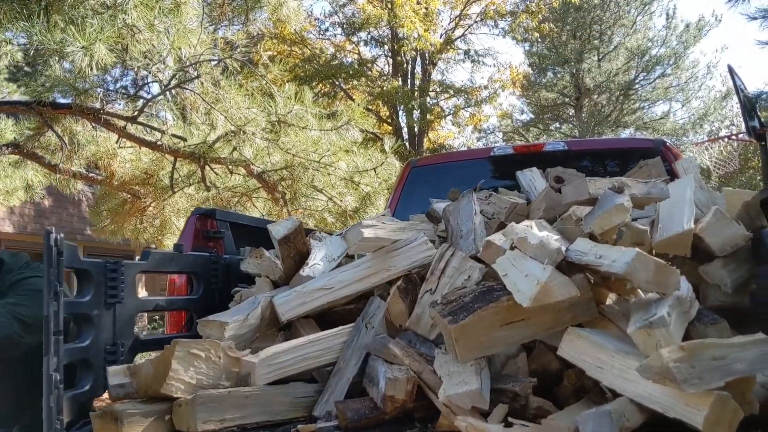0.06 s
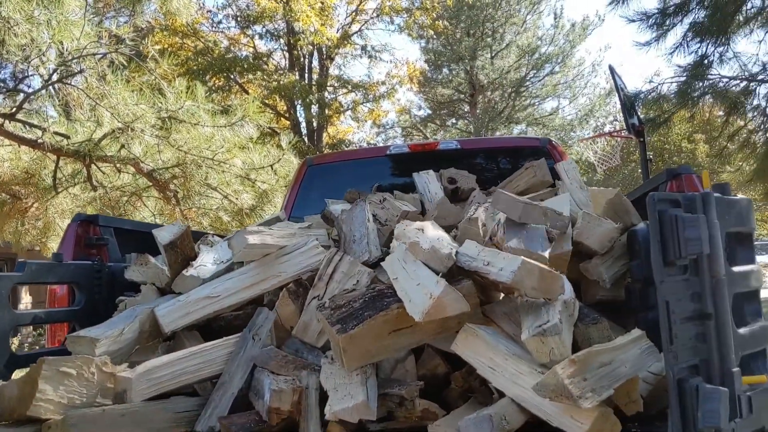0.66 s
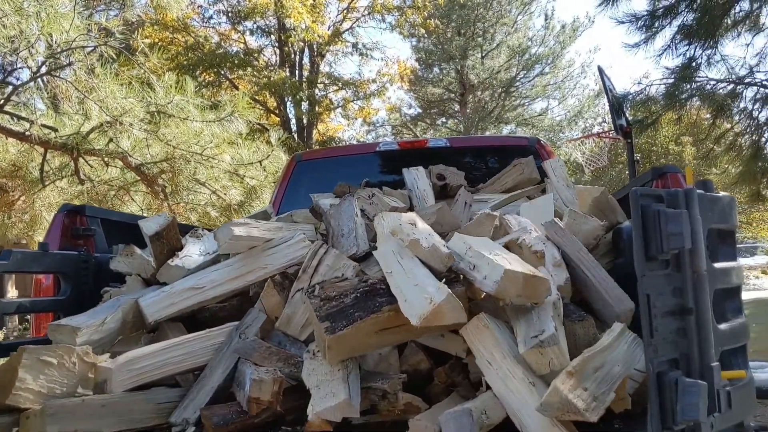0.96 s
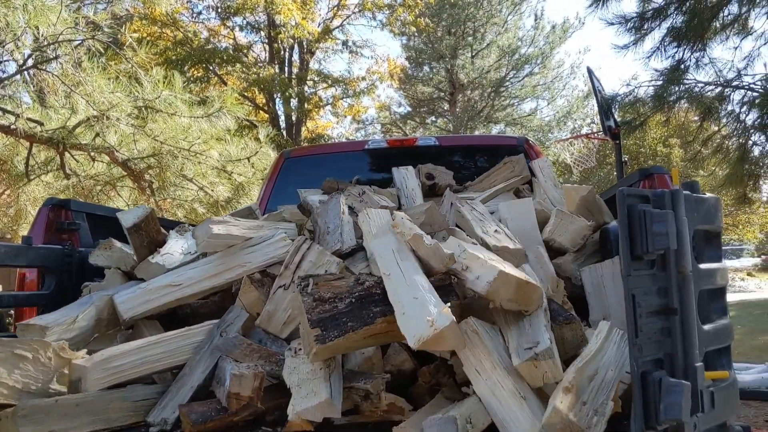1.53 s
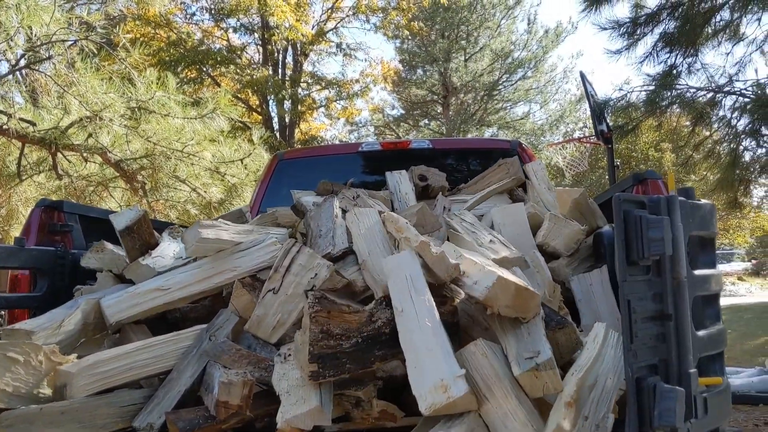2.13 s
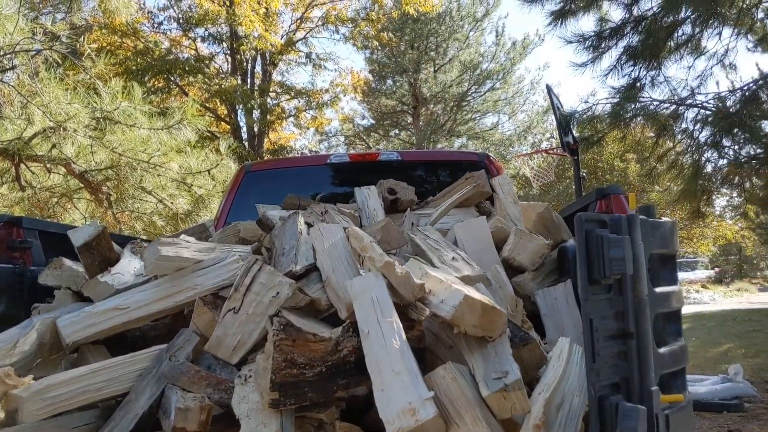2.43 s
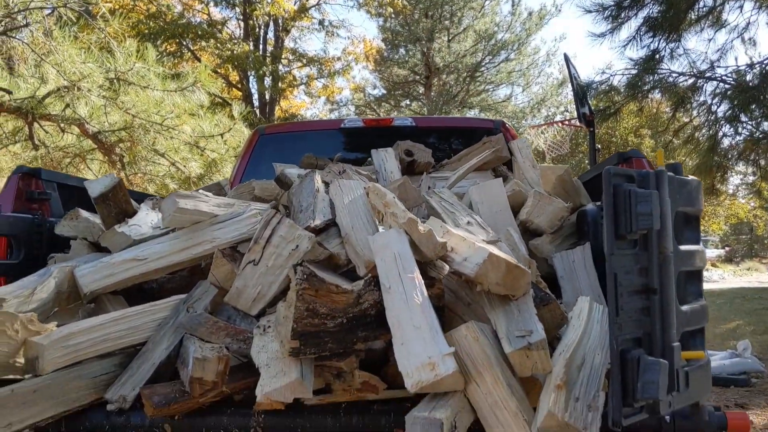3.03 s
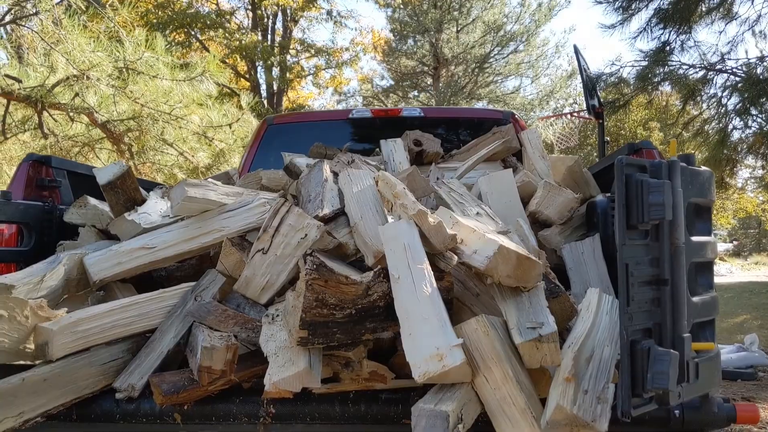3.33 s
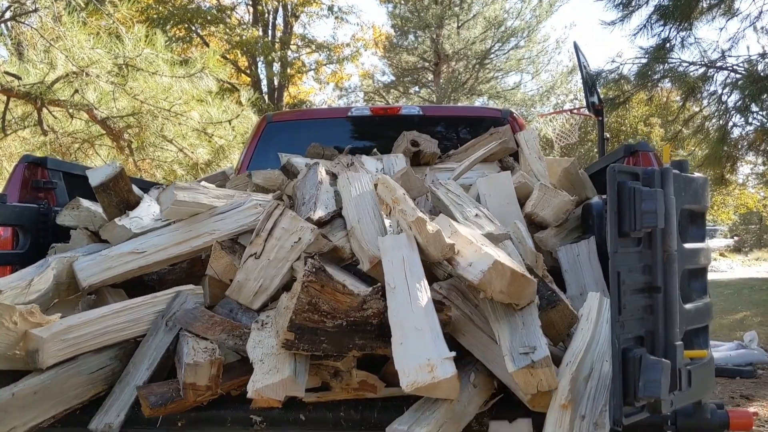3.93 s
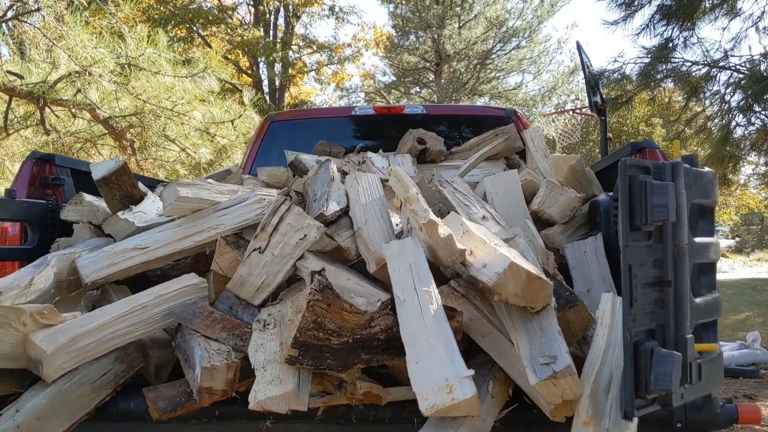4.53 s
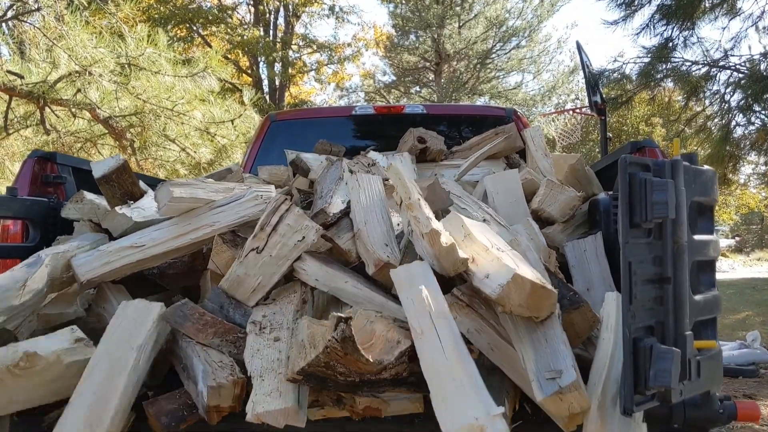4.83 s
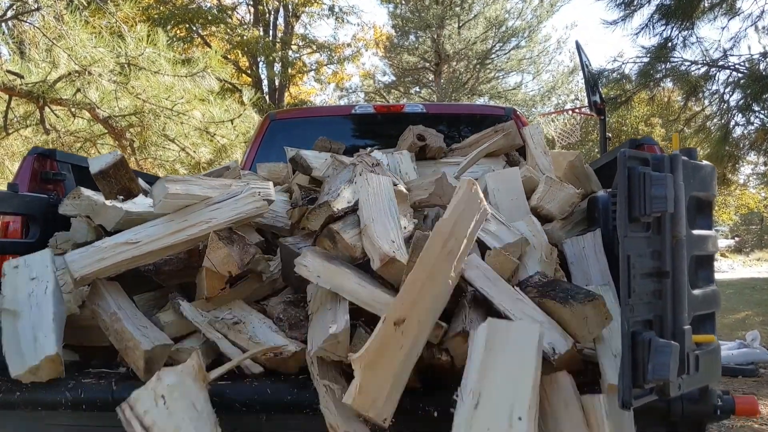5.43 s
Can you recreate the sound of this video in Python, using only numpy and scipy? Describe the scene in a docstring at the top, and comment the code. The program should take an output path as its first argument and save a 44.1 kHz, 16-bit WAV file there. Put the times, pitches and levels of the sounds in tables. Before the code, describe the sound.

A load of split firewood is dragged along a pickup truck bed. It judders at first, then creeps on with a low, lumpy rumble while bark scrapes and crackles. Logs clack together and drop onto the bed with hollow thuds. The dragging eases briefly, picks up again, and ends in a louder tumble of wood. It is heard close up at the tailgate, outdoors.

```python
"""Outdoors, microphone close in at a pickup's tailgate: a cargo unloader drags split firewood along the bed.
As the pull begins the sheet sticks and slips, and the load judders. The heap then creeps on, rumbling,
while bark scrapes and splinters, logs clack together and drop on the bed with hollow thuds.
Around 3.5 s the dragging eases, then picks up again; at the end the front of the heap tumbles
over the edge. Behind it all lies the low murmur of the open air."""
import sys
import numpy as np
from scipy import signal
from scipy.fft import rfft, irfft, next_fast_len
from scipy.io import wavfile
from scipy.ndimage import uniform_filter1d, map_coordinates

SR = 44100
rng = np.random.default_rng(int(sys.argv[2]) if len(sys.argv) > 2 else 0)


def transcribe(signal):
    """Save signal, clipped to [-1, 1], as a 16-bit WAV file at the path in sys.argv[1]."""
    frames = np.atleast_2d(signal).T
    limited = np.clip(frames, -1, 1)
    pcm = np.round(limited * 32767).astype(np.int16)
    wavfile.write(sys.argv[1], SR, pcm)


N = 246519
BLOW_TIME_S = np.arange(SR // 3) / SR  # time within one blow

# Levels in the tables are relative: each layer adds its own gain.
# the moving load: time_s, scrape_db, rumble_db
LOAD_LEVELS = [(0.0, -48, -46.5), (0.3, -50.5, -42.5), (1.15, -48, -45), (1.25, -44.5, -40),
               (1.4, -48.5, -37), (1.57, -49.5, -43), (3.22, -55.5, -50), (3.5, -59, -60.5),
               (3.66, -58.5, -58), (3.83, -49.5, -37), (4.03, -46, -44), (4.33, -49.5, -43.5),
               (4.53, -44.5, -39), (4.78, -49.5, -37.5), (4.95, -45, -40.5), (5.23, -42.5, -45.5),
               (5.43, -43, -47), (5.59, -33, -27.5)]
# logs dropping on the bed: start_s, panel_hz, boom_db, knock_db, crush_s
LOG_DROPS = [(0.828, 244.5, -20, -26, 0.0073), (1.213, 274.5, -12, -22.5, 0.015),
             (1.318, 271, -25, -32.5, 0.013), (1.413, 439, -15, -15, 0.011),
             (1.876, 497, -37.5, -40.5, 0.0017), (1.995, 338, -46, -35.5, .003),
             (2.025, 354, -36, -50, 0.012), (2.247, 184, -37, -50, 0.0065), (2.835, 417, -40, -35, 0.0027),
             (3.119, 328, -38, -52, 0.011), (3.633, 489, -27, -26.5, .001),
             (3.862, 313, -34.5, -48.5, 0.012), (3.998, 185, -27, -28, 0.0027),
             (4.292, 308, -39, -38, .004), (4.493, 480, -45.5, -33, .006), (4.584, 136, -31.5, -65, 0.0089),
             (4.874, 173, -37, -40.5, 0.012), (5.246, 396, -30, -34, 0.0098), (5.306, 322, -43, -28, .007),
             (5.455, 134, -26, -29, .008), (5.571, 426, -23, -19.5, 0.0024)]
# log against log: start_s, low_hz, low_db, high_hz, high_db, splinter_db, crush_s, low_t60_s
LOG_CLACKS = [(0.399, 950, -40.5, 2190, -42.5, -43, 0.0061, 0.017),
              (0.726, 960, -39, 3070, -46.5, -54, .0012, .06),
              (0.746, 1670, -41.5, 1900, -36, -43, 0.0035, 0.035),
              (0.7645, 1495, -32.5, 3140, -25.5, -39.5, 0.0032, 0.042),
              (0.99, 870, -38.5, 2030, -39, -70, 0.0022, 0.056),
              (1.055, 1350, -61.5, 3055, -36, -59, 0.0028, 0.084),
              (1.83, 850, -53, 2110, -42.5, -55, 0.0059, 0.056),
              (2.838, 1354, -36, 3490, -41.5, -39.5, 0.0066, 0.022),
              (2.849, 1364, -37.5, 3210, -39, -50, 0.0039, 0.082),
              (2.888, 1364, -43.5, 3260, -49, -54, 0.0078, 0.071),
              (3.048, 1014, -59, 2800, -43.5, -78, 0.002, 0.044),
              (3.345, 1014, -57, 5180, -39.5, -41, 0.006, 0.079),
              (3.936, 804, -49, 3630, -40.5, -50, 0.0034, 0.097),
              (4.102, 960, -51.5, 3360, -40, -52, 0.0016, 0.042),
              (4.353, 980, -45.5, 2130, -34, -36.5, 0.0067, 0.02),
              (4.369, 976, -48, 2065, -32, -43, 0.01, .085),
              (4.422, 813, -35, 2190, -33.5, -48, 0.0047, 0.018),
              (4.492, 977, -35, 2120, -27.5, -32, 0.0053, 0.039),
              (4.563, 917, -37, 1800, -58, -59.5, .003, 0.028),
              (4.635, 1280, -43, 2880, -46.5, -47, 0.0023, 0.041),
              (5.203, 660, -36, 2455, -29, -46, 0.006, 0.02),
              (5.222, 920, -38, 2190, -35, -39.5, 0.022, 0.055),
              (5.251, 950, -34, 3090, -35.5, -37, 0.0071, 0.022),
              (5.291, 874, -36, 2600, -37, -35.5, .008, 0.031),
              (5.307, 930, -27.5, 2620, -38, -31, 0.011, 0.085),
              (5.335, 897, -27.5, 2550, -38, -42, 0.0032, 0.067),
              (5.378, 960, -47.5, 3040, -36.5, -38.5, 0.0027, 0.063),
              (5.4016, 940, -58.5, 3610, -28.5, -38, 0.00065, 0.033),
              (5.413, 960, -51, 2860, -33, -57, .0008, .05)]
# the sharpest splinters breaking: start_s, level_db, pitch_hz
SHARP_SPLINTERS = [(0.2076, -26.5, 5570), (0.548, -20, 5600), (0.901, -22, 3800), (1.3463, -24.5, 13100),
                   (1.472, -24.5, 4470), (1.546, -26.5, 4460), (1.997, -25, 4500), (2.204, -28.5, 8000),
                   (2.496, -29.5, 12300), (2.607, -33, 11900), (2.840, -16.5, 10200),
                   (2.9794, -33.5, 14100), (3.4161, -32.5, 12100), (3.494, -27.5, 8100),
                   (3.7818, -28, 9000), (4.084, -22, 4970), (4.618, -25, 4050), (4.83, -23.5, 6900),
                   (5.118, -16, 5930), (5.531, -19, 3870)]
# a log slipping over bark: start_s, length_s, level_db
BARK_SLIPS = [(1.69, 0.058, -46), (2.011, 0.052, -43.5), (2.8, 0.034, -44), (4.851, 0.029, -53.5),
              (5.077, 0.025, -53.5)]
# modes of the bed panels: pitch_hz, level_db, t60_s
BED_MODES = [(68.5, -18, 0.29), (154, 0.5, 0.19), (262, -7, 0.65), (290.8, 6.5, 0.11), (429, -4, 0.13),
             (527.5, 1.5, 0.13), (716, -21, 0.14), (913, -4, 0.051)]
# spectra of the sources: frequency_hz, level_db
RUMBLE_SPECTRUM = [(30, -24), (70, 3), (170, 1), (300, -1), (420, -3), (640, -10), (820, -11),
                   (1100, -15.5), (1700, -20), (4000, -81)]  # the heap creeping on the bed
SCRAPE_SPECTRUM = [(300, -24), (900, 3), (1600, -3), (2300, 0), (3300, 4.5), (4800, -11), (8000, -16)]  # wood rubbing
BARK_SPECTRUM = [(2000, -4.5), (4500, -0.5), (5700, 0.5), (8000, -5.5), (9800, -3), (12000, -8),
                 (15500, -7)]  # bark crackling
FLAKE_SPECTRUM = [(2000, -32), (6000, -3), (10000, -11), (15500, -1)]  # the finest ticks of bark
SLAP_SPECTRUM = [(300, 8.5), (650, 0.5), (900, 5.5), (1300, -4.5), (2000, -9), (4000, -14), (9000, -29)]  # a log slapping the bed
AIR_SPECTRUM = [(15, -6), (25, -15), (33, 8), (44, -11), (70, -5.5), (130, -14.5), (300, -23), (650, -28),
                (830, -23.5), (1400, -31.5), (4000, -47), (15000, -45.5)]  # the open air
# decay of the reflections from bed walls and trees: frequency_hz, t60_s
YARD_DECAY = [(100, 0.48), (400, 0.27), (2000, 0.075), (12000, 0.34)]
# likeness of left and right at the microphone: frequency_hz, correlation
MIC_CORRELATION = [(30, 0.95), (100, 1), (300, 0.9), (900, 0.77), (1600, 0.8), (2800, -0.07), (5000, 0.031),
                   (15000, -0.083)]
# colour of the microphone's two sides: frequency_hz, left_minus_right_db
MIC_BALANCE = [(300, 0.1), (1100, 1.5), (2100, -3.5), (3200, -9), (4600, -2.5), (6000, -1.5), (8000, -1.5),
               (11500, 2), (14500, -5)]

USUAL_KNOCK_DB = -30  # a landing's slap and clack are scaled from this knock
SPLINTER_HZ = 6730  # centre pitch of the lesser splinters


def drag(rumble_gain_db=0.5, scrape_gain_db=-1.5, bark_gain_db=-3):
    """The heap creeps on the sheet: a lumpy rumble, scraping wood and crackling bark."""
    times, *levels = np.transpose(LOAD_LEVELS)
    scrape_db, rumble_db = [np.interp(np.arange(N) / SR, times, level) for level in levels]
    slip = wobble(45)  # sticking and slipping shakes both rumble and rubbing
    lumps = rng.standard_normal((2, N)) * amp(2.8 * slip + 1.7 * wobble(70))
    rumble = stereo(lumps, RUMBLE_SPECTRUM)
    # each fracture rattles for a few milliseconds among the logs
    rattle = rng.standard_normal((2, len(BLOW_TIME_S))) * decay(0.015)
    snaps = unit(signal.fftconvolve(grit(N, 200, spread_db=5.5), rattle, axes=1)[:, :N])
    rub = lambda: unit(grit(N, 6000, spread_db=0.5) * amp(2.84 * slip + 1.4 * wobble(130)))
    flakes = stereo(grit(N, 500, spread_db=4.5), FLAKE_SPECTRUM)
    scrape = stereo(patchy(rub() + 0.59 * snaps, depth_db=2.5), SCRAPE_SPECTRUM)
    bark = stereo(patchy(rub() + 0.73 * snaps, depth_db=3, size=7), BARK_SPECTRUM) + 0.38 * flakes
    friction = amp(scrape_gain_db) * scrape + amp(bark_gain_db) * bark
    return amp(rumble_db + rumble_gain_db) * rumble + amp(scrape_db) * friction


def judder(count=10, period_s=0.056, slowing_s=0.00083, peak_s=0.26, fade_db_per_s=26):
    """The sheet sticks and slips: jolts that slow, swell and fade, as rows for bed_blows."""
    jolt = np.arange(count)
    start_s = 0.037 + period_s * jolt + slowing_s * jolt ** 2
    boom_db = -32.5 - fade_db_per_s * np.abs(start_s - peak_s)
    panel_hz = 191 * np.exp(0.17 * rng.standard_normal(count))
    return list(zip(start_s, panel_hz, boom_db, boom_db - 7.5))


def stirrings(levels_db, count, crowding=0.9, spread_db=2, spread_octaves=0.296):
    """Small shifts, denser and stronger where the heap moves more: start_s, level_db, pitch_ratio."""
    draws = rng.random((count, 3))
    t = np.arange(N) / SR
    level_db = np.interp(t, np.transpose(LOAD_LEVELS)[0], levels_db)
    travel = np.cumsum(amp(crowding * level_db))
    start_s = np.interp((np.arange(count) + draws[:, 0]) / count, travel / travel[-1], t)
    size, pitch = np.sqrt(3) * (2 * draws[:, 1:].T - 1)  # unit variance
    return zip(start_s, np.interp(start_s, t, level_db) + spread_db * size, 2 ** (spread_octaves * pitch))


def bed_blows(bump_hz=200):
    """Drops, judder and small bumps strike the bed: start_s, panel_hz, boom_db, knock_db."""
    rumble_db = np.transpose(LOAD_LEVELS)[2]
    bumps = [(s, bump_hz * pitch, db + 1, db - 8) for s, db, pitch in stirrings(rumble_db, count=7)]
    return [row[:-1] for row in LOG_DROPS] + judder() + bumps


def thuds(settle_s=0.0083, hardness=0.2, slap_growth=0.61):
    """A heavy log settles over several milliseconds; the loaded bed booms and rings briefly."""
    out = np.zeros((2, N))
    push = BLOW_TIME_S / settle_s * np.exp(1 - BLOW_TIME_S / settle_s)
    shake = push + amp(-20) * decay(0.32) * rise(settle_s)
    for start_s, panel_hz, boom_db, knock_db in bed_blows():
        panel = blow(mode(panel_hz, t60_s=0.26, rise_s=0.0015) * shake)
        modes = sum(amp(db + rng.normal(0, 2)) * mode(hz, t60, settle_s) for hz, db, t60 in BED_MODES)
        ring = amp(-4.5) * blow(modes)
        # harder landings drive the bed panels more strongly than the dull heap around them
        bed = burst(band(138, 685), shake) + amp(hardness * (boom_db + 21.5)) * (ring + panel)
        boom = amp(boom_db - 2) * within(bed, 85, 308)
        knock = amp(knock_db - 2) * within(bed, 414, 870)
        slap_db = -32.5 + slap_growth * (knock_db - USUAL_KNOCK_DB)
        slap = amp(slap_db) * burst(SLAP_SPECTRUM, decay(0.12) * rise(0.0033))
        add(out, start_s, boom + knock + slap)
    return out


def log_blows(low_hz=816.6, landing_hz=2625, tap_hz=2960, tap_crush_s=0.0032, t60_s=0.037):
    """A log rings from hard clacks, its own landing and light taps in the heap: rows as in LOG_CLACKS."""
    rows = list(LOG_CLACKS)
    for s, _, _, knock_db, crush_s in LOG_DROPS:
        force_db = knock_db - USUAL_KNOCK_DB
        bright_db = 0.47 * force_db  # the bright parts grow more slowly than the knock
        high_hz = landing_hz * np.exp(0.143 * rng.standard_normal())
        rows.append((s, low_hz, force_db - 38.5, high_hz, bright_db - 39, bright_db - 51.5, crush_s, t60_s))
    scrape_db = np.transpose(LOAD_LEVELS)[1]
    for s, db, pitch in stirrings(scrape_db, count=8):
        rows.append((s, low_hz * pitch, db - 5.5, tap_hz * pitch, db + 0.5, db - 4, tap_crush_s, t60_s))
    return rows


def clacks(low_tone_db=2, high_tone_db=-1, body_t60_s=0.074):
    """Two logs meet: fibres crush for an instant, and the wood rings in short bending modes."""
    out = np.zeros((2, N))
    for start_s, low_hz, low_db, high_hz, high_db, splinter_db, crush_s, t60_s in log_blows():
        contact = np.sqrt(BLOW_TIME_S / crush_s) * np.exp(-BLOW_TIME_S / crush_s)
        body = contact + 0.4 * decay(body_t60_s) * rise(crush_s)
        low = burst(wood_colour(band(760, 1360), depth_db=3), body)
        # longer rings stand out more
        low += amp(low_tone_db) * t60_s / 0.052 * mode(low_hz, t60_s, crush_s / 2)
        high = burst(wood_colour(band(1980, 3300), depth_db=3), contact + 0.52 * body)
        high += amp(high_tone_db) * t60_s / 0.037 * mode(high_hz, t60_s * 0.51, crush_s / 2)
        wood = amp(low_db + 1.33) * blow(low) + amp(high_db - 3.5) * blow(high)
        fibres = grit(len(BLOW_TIME_S), 7000, spread_db=4)
        crunch = blow(stereo(fibres, wood_colour(BARK_SPECTRUM, depth_db=2.5)) * (contact + 0.17 * body))
        add(out, start_s, wood + amp(splinter_db + 0.66) * crunch)
    return out


def splinters(focus_db_per_octave=9):
    """A sliver breaks with a bright crack, strongest around its own pitch, and a tiny ring."""
    out = np.zeros((2, N))
    scrape_db = np.transpose(LOAD_LEVELS)[1]
    lesser = [(s, db + 19.5, SPLINTER_HZ * pitch ** 2) for s, db, pitch in stirrings(scrape_db, count=12)]
    for start_s, level_db, pitch_hz in SHARP_SPLINTERS + lesser:
        colour = [(hz, db - focus_db_per_octave * abs(np.log2(hz / pitch_hz)))
                  for hz, db in wood_colour(BARK_SPECTRUM, depth_db=3.5)]
        crack = burst(colour, decay(0.018 * (SPLINTER_HZ / pitch_hz) ** 1.5))  # finer slivers snap faster
        ring = amp(-9) * mode(pitch_hz, t60_s=0.01, rise_s=0.00067)
        add(out, start_s, amp(level_db - 21) * blow(crack + ring))
    return out


def slips(bark_db=-1):
    """A short slide tears through a dense run of fibres."""
    out = np.zeros((2, N))
    for start_s, length_s, level_db in BARK_SLIPS:
        stroke = np.sqrt(np.abs(np.sin(np.pi * np.minimum(BLOW_TIME_S / length_s, 1))))
        fibres = patchy(grit(len(BLOW_TIME_S), 3500, spread_db=1), depth_db=6.5)
        tearing = stereo(fibres, SCRAPE_SPECTRUM) + amp(bark_db) * stereo(fibres[::-1], BARK_SPECTRUM)
        add(out, start_s, amp(level_db) * stroke * tearing)
    return out


def yard(x):
    """The bed walls and the trees send a short answer back to the microphone."""
    hz, t, noise = signal.stft(rng.standard_normal((2, SR // 2)), SR, nperseg=256)
    tail = signal.istft(noise * amp(-60 * t / along(YARD_DECAY, hz)[:, None]), SR, nperseg=256)[1]
    tail = stereo(tail, [(100, 4.5), (15000, -2)])
    tail = np.pad(tail, ((0, 0), (SR // 100, 0)))  # arrives 10 ms late
    return signal.fftconvolve(x, tail / np.linalg.norm(tail[0]), axes=1)[:, :N]


def open_air():
    """The steady low murmur of the outdoors around the pickup."""
    return stereo(rng.standard_normal((2, N)), AIR_SPECTRUM)


def grit(samples, rate_hz, spread_db):
    """Two random trains of tiny fractures, most weak, a few strong."""
    chance = rng.random((2, samples))
    size = np.minimum(rng.exponential(size=samples), 3.3)
    return (chance[0] < rate_hz / SR) * amp(spread_db * size) * rng.uniform(-1.05, 1, (2, samples))


def patchy(pair, depth_db, size=4):
    """The points of contact keep changing, so the colour of the rubbing flickers."""
    cells = signal.stft(pair, nperseg=256)[2]
    flicker = uniform_filter1d(rng.standard_normal(cells.shape[1:]), size, axis=0)
    flicker = unit(uniform_filter1d(flicker, size, axis=1))
    return unit(signal.istft(cells * amp(depth_db * flicker), nperseg=256)[1][:, :pair.shape[1]])


def wood_colour(spectrum, depth_db):
    """Every piece of wood adds its own peaks and dips to a spectrum."""
    hz = np.geomspace(200, 16000, 36)
    return np.column_stack([hz, along(spectrum, hz) + depth_db * rng.standard_normal(len(hz))])


def burst(spectrum, envelope):
    """Many close, heavily damped modes struck together, as shaped noise."""
    return blow(stereo(rng.standard_normal((2, len(BLOW_TIME_S))), spectrum) * envelope)


def mode(hz, t60_s, rise_s):
    """One fading mode; higher ones reach left and right further out of phase."""
    apart = stereo_angle(hz) * rng.choice([-1, 1])
    phase = rng.uniform(0, 2 * np.pi) + np.array([[apart], [-apart]])
    return blow(np.sin(2 * np.pi * hz * BLOW_TIME_S + phase) * decay(t60_s) * rise(rise_s))


def stereo_angle(hz):
    """The mid-side angle in radians that gives the microphone's left-right correlation."""
    return np.arccos(np.clip(along(MIC_CORRELATION, hz), -1, 1)) / 2


def stereo(pair, spectrum):
    """Colour two signals and mix them: the bass is shared, the treble differs from side to side."""
    shares = lambda hz: [np.cos(stereo_angle(hz)), np.sin(stereo_angle(hz))]
    mid, side = filtered(pair, lambda hz: amp(along(spectrum, hz)) * shares(hz))
    return unit(np.array([mid + side, mid - side]))


def band(low_hz, high_hz):
    """A flat band with steep skirts, as spectrum points."""
    return [(low_hz / 4, -90), (low_hz / 2, -38), (low_hz, 0),
            (high_hz, 0), (high_hz * 2, -38), (high_hz * 4, -90)]


def within(x, low_hz, high_hz):
    """The part of a blow inside a band, scaled as a whole blow."""
    return blow(filtered(x, lambda hz: amp(along(band(low_hz, high_hz), hz))))


def filtered(x, response):
    """Filter x by a response, given as a function of frequency."""
    length = x.shape[-1]
    padded = next_fast_len(length + 4096)
    return irfft(rfft(x, padded) * response(np.fft.rfftfreq(padded, 1 / SR)), padded)[..., :length]


def along(points, hz):
    """Interpolate (frequency_hz, value) points on a log axis."""
    frequencies, values = np.transpose(points)
    return np.interp(np.log(hz + 1), np.log(frequencies + 1), values)


def wobble(rate_hz):
    """A smooth random curve, rate_hz knots a second."""
    knots = rng.standard_normal(int(N * rate_hz / SR) + 4)
    return map_coordinates(knots, [np.arange(N) * rate_hz / SR])


def decay(t60_s):
    """A blow's fade, 60 dB in t60_s."""
    return amp(-60 * BLOW_TIME_S / t60_s)


def rise(rise_s):
    """A blow's onset, climbing towards 1."""
    return 1 - np.exp(-BLOW_TIME_S / rise_s)


def blow(x):
    """Scale a blow to the energy of 30 ms at rms 1."""
    return unit(x) * np.sqrt(0.03 / BLOW_TIME_S[-1])


def unit(x):
    """Scale to rms 1."""
    return x / np.sqrt(np.mean(x ** 2) + 1e-20)


def amp(db):
    """Decibels to gain."""
    return 10 ** (np.asarray(db) / 20)


def add(track, start_s, x):
    """Mix x into the track at start_s."""
    start = max(round(start_s * SR), 0)
    part = track[:, start:start + x.shape[1]]
    part += x[:, :part.shape[1]]


def scene():
    """At the tailgate: close blows and dragging, weak reflections, and the open air behind."""
    blows = thuds() + clacks() + splinters() + slips()
    air = amp(-49) * open_air()
    return blows + amp(-14.5) * yard(blows) + drag() + air


def record(dry, ripple=0.37, spacing_hz=1930, top_hz=15950):
    """The camera's microphone: its housing ripples the treble, each side is coloured, the top is cut."""
    treble = lambda hz: hz ** 2 / (hz ** 2 + 3000 ** 2)
    housing = lambda hz: 1 + ripple * treble(hz) * np.exp(-2j * np.pi * hz / spacing_hz)
    sides = lambda hz: amp(np.outer([0.5, -0.5], along(MIC_BALANCE, hz)))
    return filtered(dry, lambda hz: housing(hz) * sides(hz) * (hz < top_hz))


dry = scene()
out = record(dry)
transcribe(out)
```